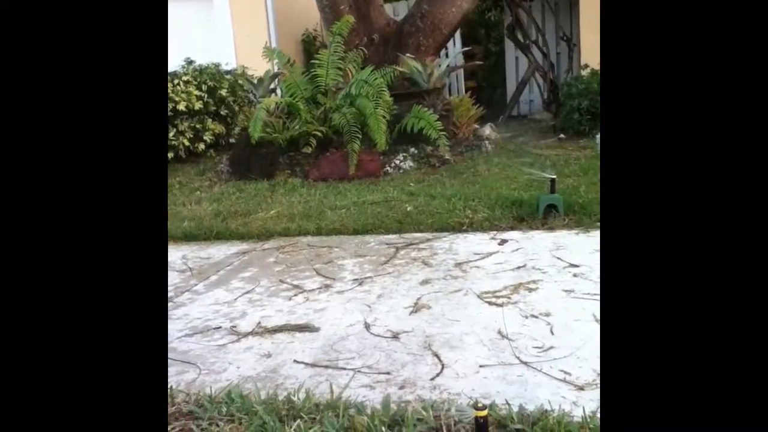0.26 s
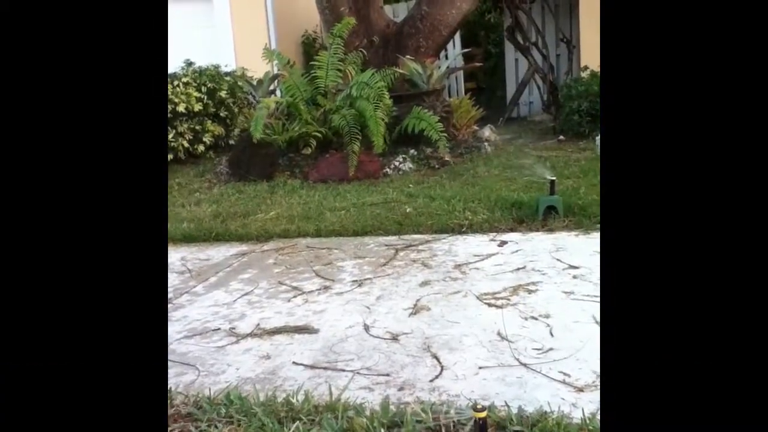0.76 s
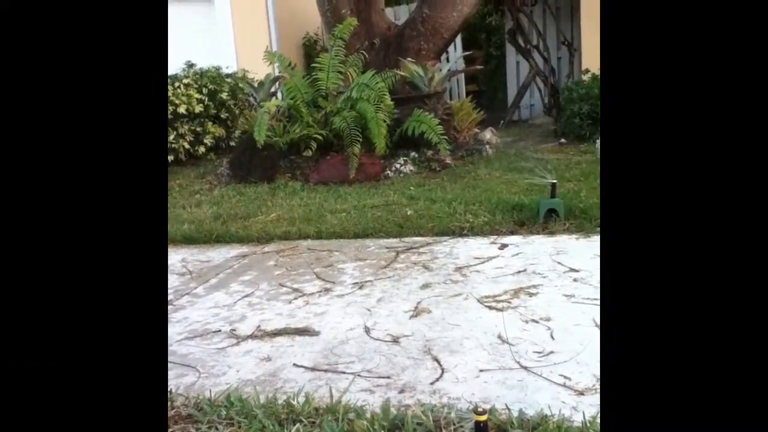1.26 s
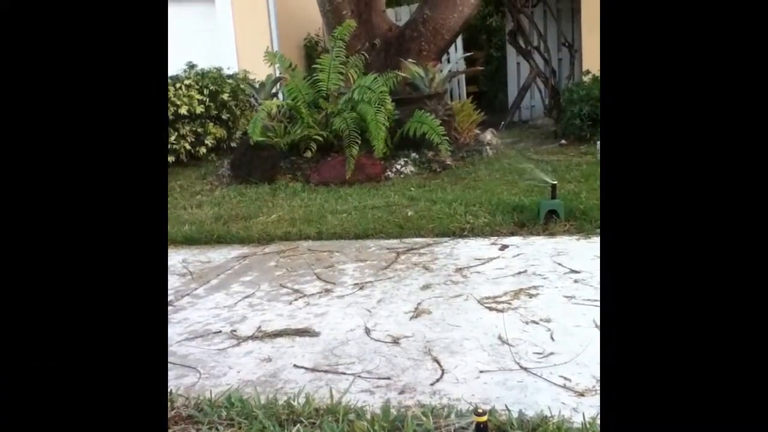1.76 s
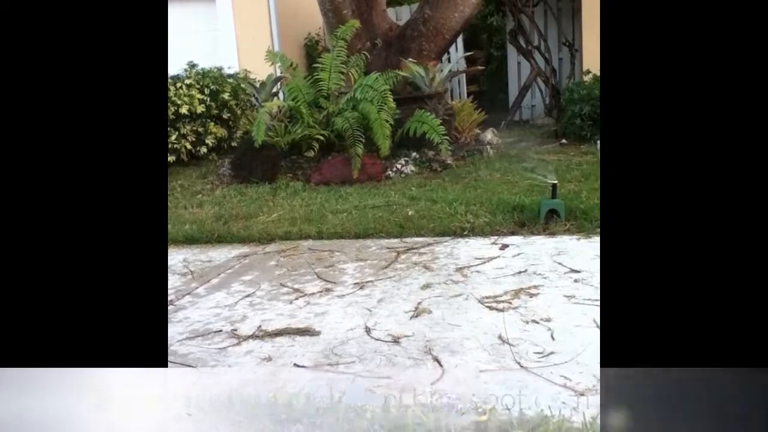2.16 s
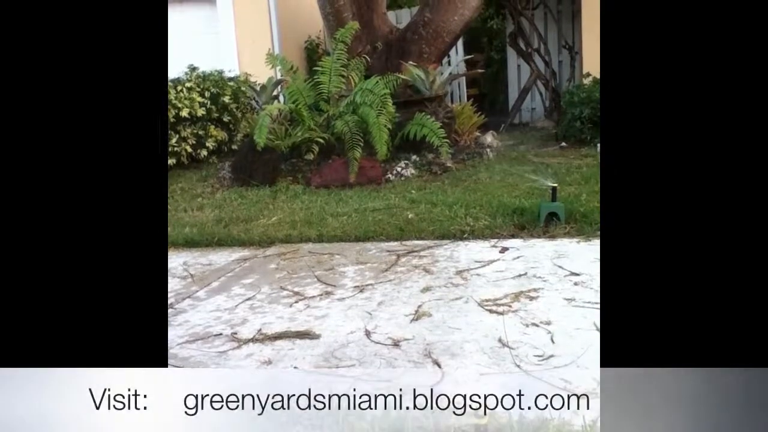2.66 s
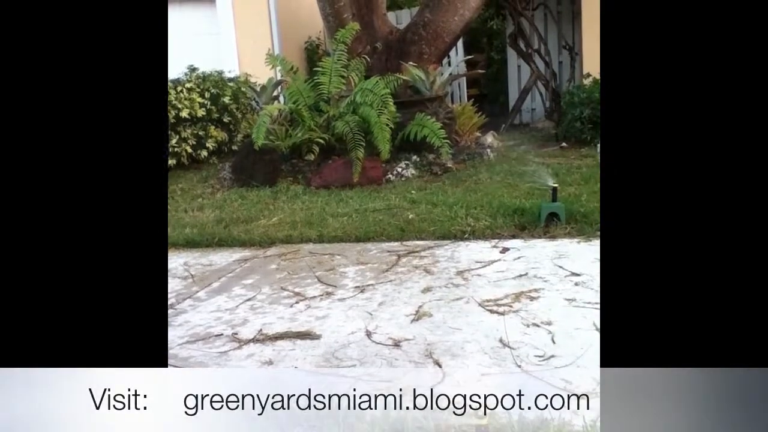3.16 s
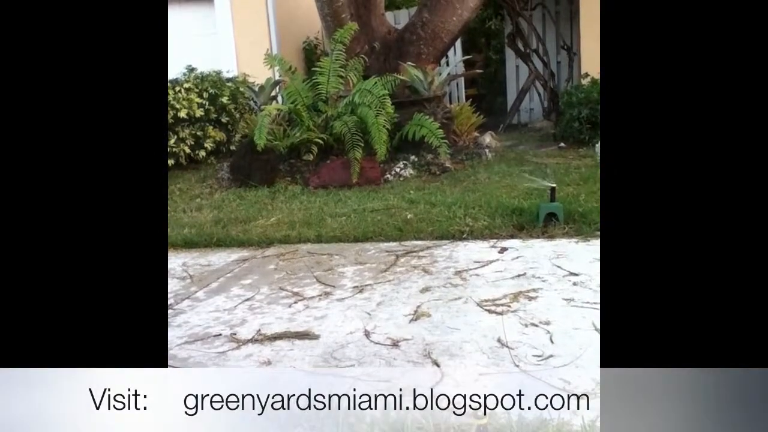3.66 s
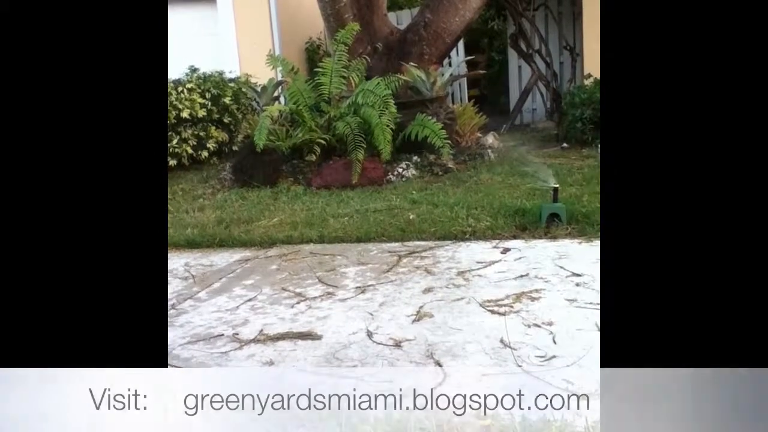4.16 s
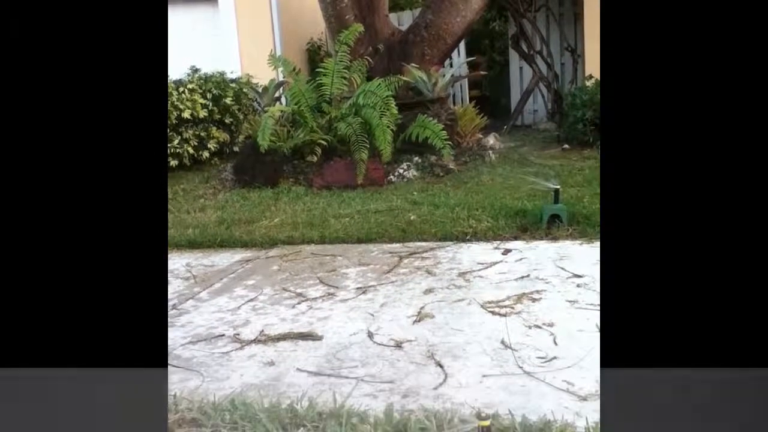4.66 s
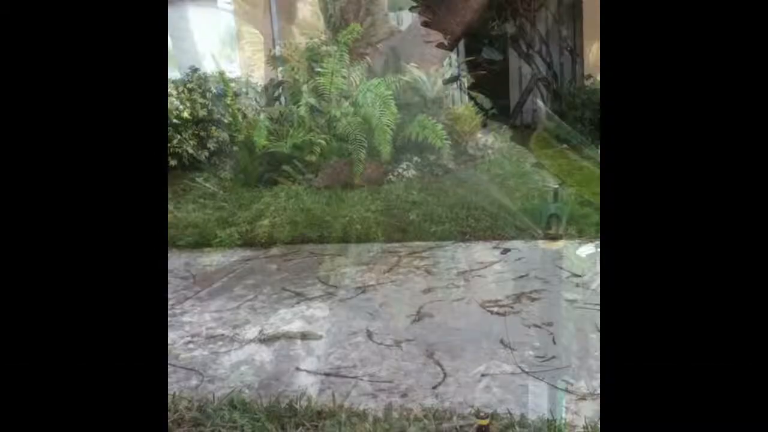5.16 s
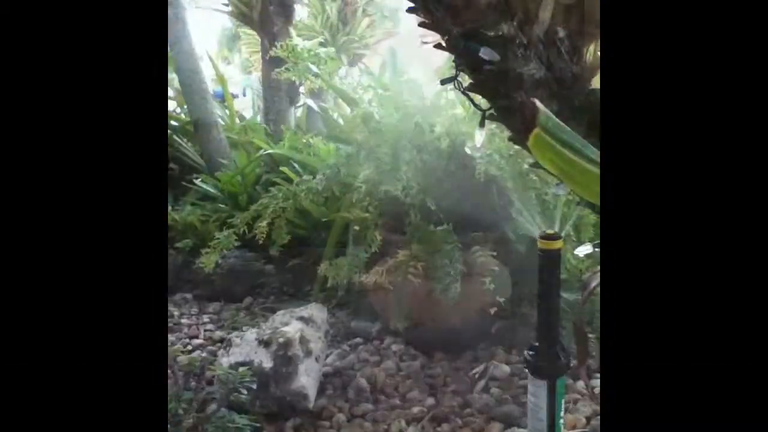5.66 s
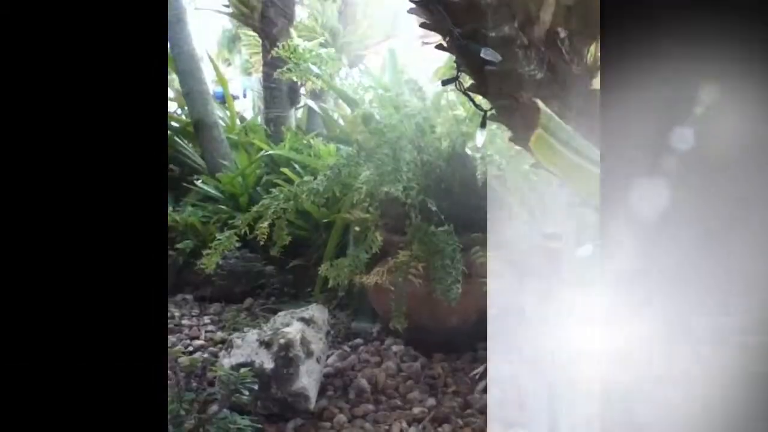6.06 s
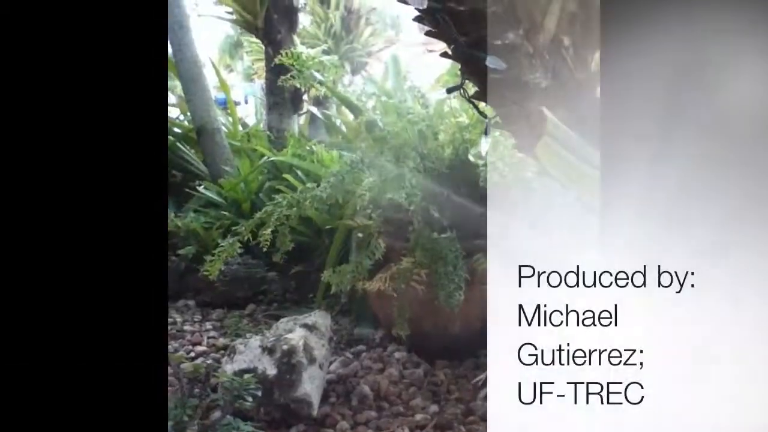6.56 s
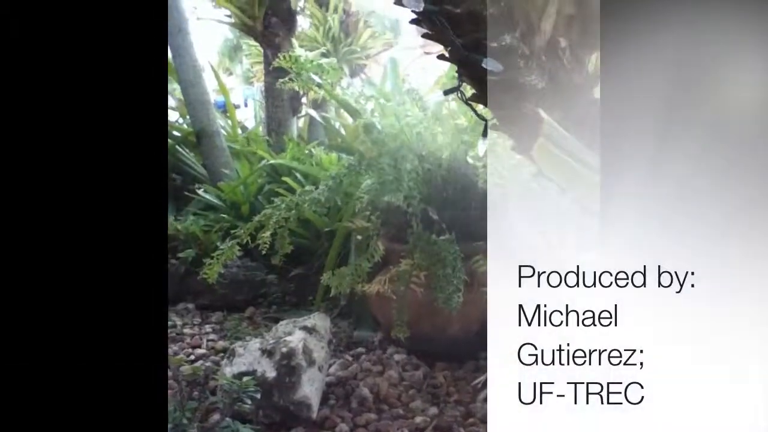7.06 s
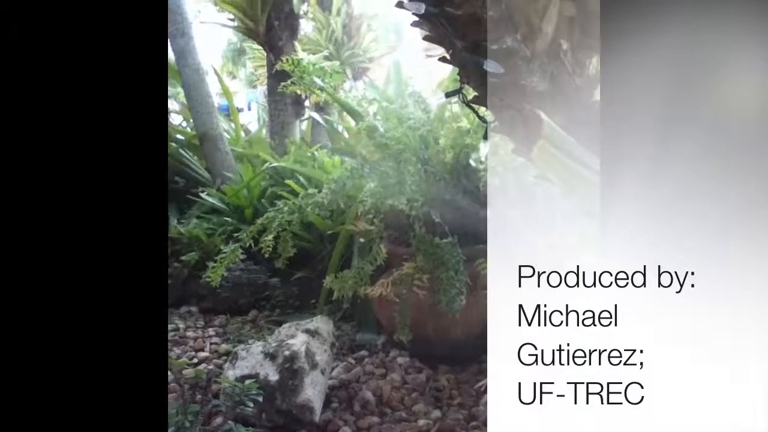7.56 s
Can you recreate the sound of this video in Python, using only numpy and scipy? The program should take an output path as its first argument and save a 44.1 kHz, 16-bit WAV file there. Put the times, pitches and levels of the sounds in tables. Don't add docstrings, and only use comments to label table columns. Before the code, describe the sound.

A lawn sprinkler hisses steadily under thumping wind and low machine hum, then close water streams drum on broad leaves with sharp splatting drops.

```python
import sys
import numpy as np
from scipy import signal
from scipy.fft import rfft, irfft, next_fast_len
from scipy.io import wavfile
from scipy.ndimage import uniform_filter1d, map_coordinates

SR = 44100
rng = np.random.default_rng(int(sys.argv[2]) if len(sys.argv) > 2 else 0)


def attenuation_scalar(level_db):
    decades = np.asarray(level_db, float) / 20
    return 10 ** decades


def output_pcm(signal):
    pcm = np.clip(np.atleast_2d(signal).T, -1, 1) * 32767
    wavfile.write(sys.argv[1], SR, np.round(pcm).astype(np.int16))


N = 343980


def unit(x):
    return x / np.sqrt(np.mean(x ** 2) + 1e-20)


def power_db(*levels_db):
    return 10 * np.log10(sum(attenuation_scalar(db) ** 2 for db in levels_db) + 1e-20)


def curves(rows):
    s, *cols = np.transpose(rows)
    return [np.interp(np.arange(N) / SR, s, c) for c in cols]


def wobble(rate_hz):
    coarse = np.arange(0, N + 32, 32)
    knots = rng.standard_normal(int(N * rate_hz / SR) + 4)
    return np.interp(np.arange(N), coarse, map_coordinates(knots, [coarse * rate_hz / SR]))


def crossing(middle_s, length_s, level_db):
    t = np.arange(0, N / SR, .001)[:, None]
    steepness = np.where(t < middle_s, 3.3, 1.2)
    away = np.abs(2 * (t - middle_s) / length_s) ** steepness
    level = power_db(*(level_db - 6 * np.minimum(away, 20)).T)
    return np.interp(np.arange(N) / SR, t[:, 0], level)


def coloured(x, spectrum):
    m = next_fast_len(N + 8192)
    hz, db = np.transpose(spectrum)
    log_hz = np.log(np.fft.rfftfreq(m, 1 / SR) + 1)
    gain = attenuation_scalar(np.interp(log_hz, np.log(hz), db, left=-120, right=-120))
    return unit(irfft(rfft(x, m) * gain, m)[:N])


def rush(spectrum, patchy_db):
    z = signal.stft(rng.standard_normal(N + 512), nperseg=512)[2]
    field = uniform_filter1d(uniform_filter1d(rng.standard_normal(z.shape), 8, axis=0), 8, axis=1)
    patchy = signal.istft(z * attenuation_scalar(patchy_db * unit(field)), nperseg=512)[1]
    return coloured(patchy[:N], spectrum)


def pings(start_s, hz, cycles, size):
    k = np.arange(192)
    turn = np.outer(hz / SR, k).astype(np.float32)
    swell = 1 - np.exp(-.8 * turn)
    decay = np.exp(-turn * np.float32(np.log(1000) / cycles))
    wave = size[:, None] * np.sin(2 * np.pi * turn) * swell * decay
    at = np.clip((start_s * SR).astype(int), 0, N)[:, None] + k
    return np.bincount(at.ravel(), wave.ravel(), N + 256)[:N]


def drops(count, hz, spread, cycles, scatter_db):
    count = count // 2
    bigness = np.minimum(rng.exponential(size=count), 3)
    size = attenuation_scalar(scatter_db * bigness) * rng.choice([-1, 1], size=count)
    pitch = np.clip(hz * np.exp(spread * rng.standard_normal(count)), 500, 15000)
    half = pings(rng.uniform(0, N / SR / 2, size=count), pitch, cycles, size)
    return unit(half + np.roll(half, N // 2))


def blend(noise, grains, share):
    share = np.clip(share, 0, 1)
    return np.sqrt(1 - share) * noise + np.sqrt(share) * grains


# start_s [s], level_db [dB]
WIND = [
    (0.0, -48),
    (0.19, -41),
    (0.95, -35.5),
    (1.13, -43.5),
    (2.08, -51),
    (2.11, -39.5),
    (2.5, -54.5),
    (3.43, -47),
    (5.37, -58),
    (7.8, -51),
]
# start_s [s], peak_db [dB], pitch_hz [Hz]
WIND_THUMPS = [(0.138, -29, 38.2), (0.224, -24, 53.7), (0.328, -27, 45), (0.627, -39, 37.97),
               (0.67, -19, 81), (0.742, -27, 37.57), (0.808, -20.5, 130), (0.829, -38, 38),
               (0.847, -21, 104), (0.873, -21.5, 127), (0.893, -27, 51.1), (0.936, -20, 110),
               (1.469, -30, 37.4), (1.712, -25.5, 40), (1.787, -39, 91.2), (1.989, -31, 77.9),
               (2.096, -26, 59), (2.164, -40, 37.7), (3.449, -35, 37.7)]
# pitch_hz [Hz], level_db [dB per Hz]
BUFFET = [(10, -23), (25, 2.5), (55, 3), (85, -1.5), (130, -39), (300, -52)]
# pitch_hz [Hz], level_db [dB per Hz]
RUMBLE = [(60, -33), (110, 1), (160, -7), (260, -12.5), (500, -26)]
# pitch_hz [Hz], level_db [dB per Hz]
STREET = [(150, 1), (280, -2), (450, -6.5), (700, -6.5), (1100, -12.5), (2000, -14)]
# pitch_hz [Hz], level_db [dB per Hz]
YARD = [(200, -8), (350, -2.5), (600, 0.5), (1000, 4.5), (1800, -13), (3000, -29)]


def wind_thumps():
    t = np.arange(N) / SR
    thumps = np.zeros(N)
    for s, db, hz in WIND_THUMPS:
        near = slice(max(int((s - .05) * SR), 0), int((s + .1) * SR))
        turn = (t[near] - s) * hz - .6
        thumps[near] -= attenuation_scalar(db - 2.5) * np.cos(2 * np.pi * turn) * np.exp(-(turn / 0.53) ** 2)
    return thumps


def air(fade):
    buffet_db, = curves(WIND)
    t = np.arange(N) / SR
    dip_db = -2.5 * 4 * fade * (1 - fade)
    swell_db = 1 * np.cos(2 * np.pi * (t - 2.03) / 2.6)
    rumble_db = -50 + 1 * wobble(2.51) + swell_db + dip_db - 2 * fade
    drumming_db = crossing(*np.transpose(SWEEPS)[:3]) - 27
    murmur_db = power_db(-56.5 + swell_db + dip_db - 1.5 * fade, drumming_db)
    gusts = unit(attenuation_scalar(2.6 * wobble(7.6)) * rush(BUFFET, patchy_db=-3.0))
    wind = attenuation_scalar(buffet_db + 0.8) * gusts
    rumble = attenuation_scalar(rumble_db - 1.0) * rush(RUMBLE, patchy_db=-2.5)
    murmur = blend(rush(STREET, patchy_db=-1.0), rush(YARD, patchy_db=0.7), fade)
    return wind + wind_thumps() + rumble + attenuation_scalar(murmur_db + 3.5) * murmur


# middle_s [s], length_s [s], level_db [dB]
HUM = [(0.09, 0.2, -42.5), (.55, 0.68, -38.5), (1.19, 0.36, -39), (1.718, 0.55, -40), (2.3, 0.3, -47),
       (2.87, 0.37, -50.5), (3.45, 0.29, -49.5), (3.86, 0.32, -46), (4.24, 0.25, -43.5), (4.577, 0.38, -42),
       (5.005, 0.52, -44.5), (5.444, 0.53, -52.5)]
# multiple [of the hum pitch], level_db [dB]
OVERTONES = [(2, -16), (3, -24.5)]
# pitch_hz [Hz], level_db [dB]
WHINE = [(1040, -66)]
# pitch_hz [Hz], level_db [dB]
DRONE = [(70.0, -58.5), (118.4, -53), (140.0, -57.5), (209.9, -67)]


def machines(fade):
    t = np.arange(N) / SR
    hum_hz = 90.45 + 0.31 * wobble(2.97)
    phase = 2 * np.pi * np.cumsum(hum_hz) / SR
    hum = attenuation_scalar(crossing(*np.transpose(HUM))) * np.sin(phase)
    upper, drone = np.zeros(N), np.zeros(N)
    for multiple, db in OVERTONES:
        upper += attenuation_scalar(-46.0 + db + 1.8 * wobble(4.5)) * np.sin(multiple * phase)
    for hz, db in WHINE:
        upper += attenuation_scalar(db - 4 + 3.3 * wobble(2.93)) * np.sin(2 * np.pi * hz * t + 0.75 * wobble(6))
    for hz, db in DRONE:
        drone += attenuation_scalar(db + 0.1 + 1.4 * wobble(4)) * np.sin(2 * np.pi * hz * t + 0.55 * wobble(3.9))
    return np.sqrt(2) * (hum + (1 - fade) * upper + fade * drone)


# middle_s [s], length_s [s], level_db [dB], pitch_hz [Hz]
PASSING = [
    (3.58, 0.72, -53, 125),
    (4.75, .8, -59.5, 235),
    (4.9, 0.58, -60.5, 220),
    (4.45, 0.38, -55, 140),
]


def engines():
    t = np.arange(N) / SR
    notes = np.zeros(N)
    for s, length, db, hz in PASSING:
        level_db = crossing(*np.transpose([(s, length, db)])) + 2.4 * wobble(7)
        notes += np.sqrt(2) * attenuation_scalar(level_db) * np.sin(2 * np.pi * hz * t + 0.63 * wobble(6))
    return notes


def splats(table, count, low_hz, low_cycles, gain_db, scatter_db, fading_db):
    s, db, low_db, length = np.transpose(table)[:, :, None]
    u, z = rng.uniform(size=(len(s), count)), rng.standard_normal((len(s), count))
    z = np.clip(z, -1, 1)
    order = np.arange(count)
    late = (order + .9 * u * (order > 0)) / count
    at = (s + .0012 + late * length).ravel()
    tick_db = db + gain_db - fading_db * late + scatter_db * (u[:, ::-1] - .5)
    tap_db = db + gain_db + low_db + 6.0 - 11.0 * late
    ticks = pings(at, 8800 * np.exp(0.094 * z).ravel(), 8.2, attenuation_scalar(tick_db).ravel())
    taps = pings(at, low_hz * np.exp(0.12 * z[:, ::-1]).ravel(), low_cycles, attenuation_scalar(tap_db).ravel())
    return ticks + taps


# start_s [s], peak_db [dB], low_part_db [dB], length_s [s]
TICKS = [(0.9553, -19, -10, .0007), (1.0228, -31, -20, .0007), (1.4663, -17.5, -19, 0.001),
         (2.2248, -24, -20, .0007), (3.291, -27, -18, .002), (3.4994, -26, -18, 0.002),
         (3.744, -29, -22, 0.002), (3.8144, -22, -26, .0008), (3.8506, -23, -16, .0008),
         (3.897, -33, -20, 0.0014), (4.9348, -18, -21, 0.0011), (5.2425, -33, -22, .001),
         (5.2508, -27, -22, .001), (5.3592, -13, -30, 0.0013), (5.3615, -25, -18, .001),
         (5.3632, -15, -21, .0007), (5.3652, -24, -12, .001), (5.4766, -20, -24, .002),
         (5.489, -24, -24, .0025), (5.5837, -34, -24, .001), (6.03, -20, -16, .001),
         (6.072, -16.5, -16, 0.003), (6.218, -22, -12, .001), (6.2692, -14, -24, .0014),
         (6.35, -21, -10, .001), (6.4352, -14, -26, 0.0022), (6.4432, -23, -20, .001),
         (6.6308, -20, -24, .0024), (6.635, -17, -24, .002), (6.6412, -13, -30, .0024),
         (6.6947, -19, -24, .0005), (6.7271, -18, -24, .0024), (6.794, -17, -18, .001),
         (7.0955, -24, -22, .001), (7.148, -26, -15, 0.001), (7.1895, -27, -9, .001),
         (7.2167, -14, -30, .001), (7.3452, -22, -24, .002), (7.6284, -24, -10, .001)]
# start_s [s], peak_db [dB], low_part_db [dB], length_s [s]
SPLATS = [(5.2894, -36, -10, 0.01), (5.3596, -25, -21, 0.009), (5.472, -17, -28, 0.015),
          (5.488, -22, -28, 0.013), (5.785, -22, -19, 0.0076), (6.267, -13.5, -30, 0.01),
          (6.436, -14, -16.5, 0.012), (6.627, -17, -33, 0.018), (6.68, -18, -32, 0.01),
          (6.724, -15, -33, 0.013), (7.188, -26, -11, 0.015), (7.3421, -10.5, -27, 0.016)]


def stray_drops():
    small = splats(TICKS, count=2, low_hz=6200, low_cycles=11.0, gain_db=17.0, scatter_db=-1.0, fading_db=7.0)
    big = splats(SPLATS, count=15, low_hz=2830, low_cycles=11.6, gain_db=11.0, scatter_db=6, fading_db=5.5)
    return small + big


# start_s [s], level_db [dB], pitch_hz [Hz]
TAPS = [(0.957, -15, 9500), (0.9573, -22, 3500), (1.1308, -14, 6400), (1.1312, -15, 9500),
        (1.4598, -16, 12000), (2.4463, -15, 5800), (4.0698, -22, 4200), (4.936, -11, 5700),
        (4.937, -15, 4370), (5.3612, -10, 6200), (5.365, -13, 5800), (5.786, -14, 5500), (5.5849, -9, 9000),
        (6.1252, -11, 3000), (6.5767, -8, 9000), (6.6186, -8, 4500), (6.7153, -15, 3000),
        (6.8989, -16, 2600), (7.3948, -12, 4500), (7.5025, -3, 4270), (6.4372, -3.5, 9000),
        (6.4388, -6, 8500), (7.6797, -5, 4000), (6.2195, -6, 4000)]


def lone_drops():
    s, db, hz = np.transpose(TAPS)
    return pings(s, hz, 7.8, attenuation_scalar(db))


# middle_s [s], peak_db [dB], pitch_hz [Hz]
POPS = [
    (7.436, -20.5, 1805),
    (7.435, -30, 2170),
]


def pops():
    t = np.arange(N) / SR
    return sum(attenuation_scalar(db) * np.sin(2 * np.pi * hz * t) * np.exp(-((t - s) / 0.0051) ** 2) for s, db, hz in POPS)


# middle_s [s], length_s [s], drop_db [dB], leaf_hz [Hz]
LEAVES = [(3.518, 0.047, -39, 2750), (3.56, .05, -41, 4300), (3.71, 0.047, -36, 2780),
          (3.74, 0.043, -42, 2050), (3.801, 0.082, -44, 2300), (6.036, 0.029, -37, 1310),
          (6.232, .08, -28, 4500), (7.67, .08, -25.5, 1550), (7.632, .05, -26, 4300),
          (7.74, 0.055, -28, 4400), (6.13, .1, -30.5, 1500), (6.169, .1, -30, 3100),
          (7.689, 0.11, -26, 4200), (7.4, .04, -33, 4500), (5.291, .015, -36, 1400),
          (5.33, 0.037, -33, 3300), (5.68, 0.073, -36, 2980), (5.789, 0.0099, -28, 3220),
          (6.042, 0.028, -30.5, 1930), (6.202, 0.056, -29, 1890), (6.371, 0.08, -19.5, 4200),
          (6.365, 0.025, -16.5, 1800), (6.392, 0.032, -22.5, 1660), (6.487, 0.022, -24.5, 1710),
          (6.5, 0.061, -18, 4180), (6.515, .04, -19, 3000), (6.563, 0.031, -23, 1930),
          (6.612, .02, -23, 4600), (6.722, .012, -27.5, 3070), (6.904, 0.018, -32, 2600),
          (7.508, 0.056, -18, 4350), (7.555, 0.046, -31, 1480), (7.569, 0.048, -22.5, 4300),
          (7.679, 0.05, -23, 3300), (7.7, 0.076, -28, 4950), (7.79, 0.019, -26, 1900)]


def struck_leaves(count):
    s, length, db, hz = np.transpose(LEAVES)[:, :, None]
    shape = (len(s), count)
    when, detune, strength = rng.uniform(-.5, .5, shape), rng.standard_normal(shape), rng.standard_normal(shape)
    crowd_db = 10 * np.log10(length / .05)
    size = attenuation_scalar(db + 1.0 + crowd_db + 3.7 * strength)
    return pings((s + when * length).ravel(), (hz * np.exp(0.09 * detune)).ravel(), 13.2, size.ravel())


# pitch_hz [Hz], level_db [dB per Hz]
FIZZ = [(9500, -37), (10800, 4), (12000, 4), (13200, -2.5), (14300, -1), (15300, -3.5), (16000, -6)]
# start_s [s], level_db [dB], landing_distance_m [m]
FAR = [(0, -35.5, 3.7), (.6, -35.5, 5), (1.15, -35.5, 4.3), (1.3, -37.5, 4.1), (1.5, -36, 3.4),
       (2.0, -39, 4.55), (2.5, -36.5, 6.6), (2.85, -36.5, 5.6), (3.5, -38.5, 5.3), (3.8, -36, 4.7),
       (3.95, -38, 4.9), (4.4, -37.5, 5.8), (4.6, -38.5, 4.6), (4.68, -36, 5.3), (4.9, -39, 4.4)]
# middle_s [s], length_s [s], level_db [dB]
PASSES = [(.2, 0.076, -44.5), (0.372, 0.1, -48.5), (.96, 0.038, -48.5), (1.523, 0.033, -46.5),
          (1.832, 0.043, -48.5), (2.23, 0.19, -50.5), (3.335, 0.17, -51), (3.494, .07, -49.5),
          (3.553, 0.073, -44), (3.714, 0.12, -48.5), (3.84, 0.055, -52), (4.175, 0.066, -52.5),
          (4.49, .05, -53), (4.643, .06, -67)]
# pitch_hz [Hz], level_db [dB per Hz]
HISS_FAR = [(3000, -33), (5000, -12.5), (7200, -14.5), (8400, -5), (9550, 1), (10500, -7), (11500, -11),
            (13000, -26)]
# pitch_hz [Hz], level_db [dB per Hz]
GRASS = [(400, -39), (900, -5.5), (1600, -2.5), (2800, 1), (4500, -1), (6500, -1.5), (10000, -8.5)]
# pitch_hz [Hz], level_db [dB per Hz]
MIST = [(5000, -54), (6800, -1), (8200, 7), (9000, -4), (10000, -12)]
# pitch_hz [Hz], level_db [dB per Hz]
SHRUBS = [(800, -12), (1500, -1.5), (2500, 0), (4000, -2.5), (6500, -3.5), (9000, -14)]


def far_sprinkler():
    t = np.arange(N) / SR
    hiss_db, metres = curves(FAR)
    spreading_db = -20 * np.log10(metres)
    patter_db = -35.5 + spreading_db
    cloud_db = 8 / (1 + (t / 0.99) ** 12)
    mist_db = -30.5 + spreading_db + cloud_db
    fizz_db = -43 + 0.67 * t + .3 * (hiss_db - hiss_db.mean())
    sputter = wobble(14)
    nozzle_drops = drops(count=9000, hz=9270, spread=0.13, cycles=14, scatter_db=2.5)
    hiss = blend(rush(HISS_FAR, patchy_db=1.0), nozzle_drops, share=0.2)
    grass_drops = drops(count=9000, hz=3500, spread=0.49, cycles=3.8, scatter_db=2.5)
    patter = blend(rush(GRASS, patchy_db=1.5), grass_drops, share=0.17)
    mist = attenuation_scalar(mist_db - 5.0) * rush(MIST, patchy_db=2.5)
    fizz = attenuation_scalar(fizz_db - 0.6 + 1.1 * wobble(10) + 0.27 * sputter) * rush(FIZZ, patchy_db=1.5)
    shrubs_db = crossing(*np.transpose(PASSES)) + 3.5 + 0.81 * wobble(29.97)
    shrubs = attenuation_scalar(shrubs_db) * rush(SHRUBS, patchy_db=-0.2)
    jet = attenuation_scalar(hiss_db + 0.25 + 0.5 * sputter) * hiss + attenuation_scalar(patter_db + 3.0 + .5 * sputter) * patter
    return jet + mist + fizz + shrubs


# start_s [s], level_db [dB]
NEAR = [(4.86, -39), (5.2, -37), (5.6, -34.5), (5.78, -29.5), (5.855, -30), (5.875, -35), (6.08, -30.5),
        (6.16, -33), (6.5, -29.5), (6.59, -32.5), (6.66, -30.5), (7.0, -31), (7.35, -28), (7.47, -29),
        (7.56, -27.5), (7.62, -29.5), (7.68, -28.5), (7.8, -30.5)]
# middle_s [s], length_s [s], level_db [dB], heavy_over_fine_db [dB]
SWEEPS = [(4.993, 0.26, -46, 0.5), (5.276, 0.16, -44.5, 2.5), (5.293, 0.02, -42, 0),
          (5.343, 0.075, -42.5, -9), (5.48, 0.024, -45, 3), (5.55, 0.067, -49, 1), (5.683, 0.082, -44.5, 4),
          (5.808, 0.16, -41.5, 2.5), (5.946, 0.14, -43, 0.5), (6.103, 0.16, -32, 0.5),
          (6.217, 0.12, -28, -0.5), (6.329, 0.054, -27.5, 2.5), (6.377, 0.075, -26.5, 3.5),
          (6.487, 0.051, -28, 1), (6.537, 0.088, -28.5, 1.5), (6.631, 0.06, -31.5, 2),
          (6.716, 0.17, -35.5, -2.5), (6.828, 0.092, -36, -2), (6.908, 0.027, -35.5, -5),
          (7.006, 0.18, -42.5, 0), (7.172, 0.048, -41, 6.5), (7.19, 0.011, -29.5, -2.5),
          (7.26, 0.16, -37, -3), (7.356, 0.055, -39, 1), (7.408, 0.054, -30, -4),
          (7.437, 0.036, -35.5, 8.5), (7.543, 0.15, -29, 1), (7.696, 0.11, -27.5, 0.5),
          (7.81, 0.064, -29.5, 0)]
# pitch_hz [Hz], level_db [dB per Hz]
HISS_NEAR = [(3000, -26), (5000, -16.5), (6500, -15.5), (8360, 0.5), (9500, -2), (11000, -8),
             (14500, -10.5), (16000, -18)]
# pitch_hz [Hz], level_db [dB per Hz]
SIZZLE = [(4500, -13), (5500, 1.5), (6800, 3), (8000, -2.5), (9500, -25)]


def near_sprinkler():
    t = np.arange(N) / SR
    middle, length, db, heavy_over_db = np.transpose(SWEEPS)
    stream_db = crossing(middle, length, db)
    hiss_db = power_db(*curves(NEAR), stream_db - 4.5)
    drip_fine_db, drip_heavy_db = -45.5, -47.5
    fine_db = power_db(drip_fine_db, stream_db)
    heavy_db = power_db(drip_heavy_db, crossing(middle, length, db + heavy_over_db))
    sputter = wobble(28)
    nozzle_drops = drops(count=12000, hz=8800, spread=.14, cycles=14, scatter_db=3.5)
    hiss = blend(rush(HISS_NEAR, patchy_db=1.3), nozzle_drops, share=.25)
    fine_spray = rush([(2200, -2.0), (3100, 0.5), (4200, -1.0), (5200, -4.0), (7500, -5.0)], patchy_db=2.5)
    fine_drops = drops(count=12000, hz=4550, spread=0.204, cycles=20, scatter_db=5.0)
    fine = blend(fine_spray, fine_drops, share=0.23)
    heavy_spray = rush([(450, -18.0), (800, -11.5), (1200, -5.5), (1800, -4), (2500, -7.5), (3600, -11)],
                       patchy_db=1.2)
    heavy_drops = drops(count=6000, hz=1917, spread=0.2, cycles=12.6, scatter_db=6.0)
    heavy = blend(heavy_spray, heavy_drops, share=0.29)
    sizzle_db = -52 + 1 * (fine_db - drip_fine_db) + 0.5 * sputter
    sizzle = attenuation_scalar(sizzle_db) * rush(SIZZLE, patchy_db=2.2)
    linger_db = -44 - 4 * np.maximum(t - NEAR[0][0], 0)
    burst_db = stream_db - 11
    fizz = attenuation_scalar(power_db(burst_db, linger_db) + 1.9 * wobble(16)) * rush(FIZZ, patchy_db=-0.5)
    patter = attenuation_scalar(fine_db - 2.0 + 1 * sputter) * fine + attenuation_scalar(heavy_db - 5.0 + 1 * sputter) * heavy
    return fizz + sizzle + attenuation_scalar(hiss_db - 0.4 + 0.22 * sputter) * hiss + patter


# start_s [s], end_s [s]
FADE = (5.04, 6.25)


def scene():
    t = np.arange(N) / SR
    fade = np.interp(t, FADE, (0, 1))
    change_s = FAR[-1][0]
    near = np.interp(t, (change_s - .03, change_s + 0.024), (0, 1))
    water = np.sqrt(1 - near) * far_sprinkler() + np.sqrt(near) * near_sprinkler()
    single_drops = stray_drops() + lone_drops() + pops() + struck_leaves(count=36)
    background = air(fade) + machines(fade) + engines()
    left = 2 * (water + single_drops + background)
    return np.array([left, np.zeros(N)])


# pitch_hz [Hz], threshold_db [dB]
AUDIBLE = [(700, -8), (1300, -4.5), (5000, -5), (7000, -9), (12000, -9), (13000, -5), (16000, -4.5)]
# middle_s [s], length_s [s], rise_db [dB], pitch_hz [Hz], width_hz [Hz]
TREBLE_THINNING = [(.4, 1.1, 6, 14200, 200), (2.8, .85, 5.5, 14400, 1200), (2.68, .1, 7, 14500, 550),
                   (2.87, .12, 5, 14200, 350), (3.16, .05, 6, 14600, 400), (6.8, 2.2, 4, 14000, 2300),
                   (6.8, 2.2, 5, 15900, 900), (5.82, .15, 3, 14600, 900), (6.4, .35, 3, 15500, 800),
                   (6.9, .35, 2, 13200, 1000), (7.3, .2, 2, 13300, 1200), (7.45, .3, 3, 15500, 700)]


def silence_faint_patches(sound, top_hz):
    hz, t, z = signal.stft(sound, SR, nperseg=2048)
    power = np.abs(z) ** 2
    local = np.sqrt(np.abs(uniform_filter1d(power, size=5, axis=0)))
    around = np.sqrt(np.abs(uniform_filter1d(power, size=48, axis=0)))
    field = uniform_filter1d(rng.standard_normal(z.shape), size=16, axis=0)
    luck = unit(uniform_filter1d(field, size=2, axis=1))
    rise_db = np.zeros(z.shape)
    for s, length, db, at_hz, wide_hz in TREBLE_THINNING:
        rise_db += db * np.exp(-((hz[:, None] - at_hz) / wide_hz) ** 2 - (2 * (t - s) / length) ** 6)
    threshold_db = np.interp(hz, *np.transpose(AUDIBLE), left=-60)[:, None]
    spared_db = -4 * np.outer(hz < 7000, t > FADE[1])
    threshold = attenuation_scalar(threshold_db + spared_db + rise_db * (1 + .35 * luck))
    kept = np.clip(10 * (local / (around + 1e-12) / threshold - 1), 0, 1) * (hz < top_hz)[:, None]
    return signal.istft(z * kept, SR, nperseg=2048)[1][:N]


def roll_off(x):
    return signal.sosfilt(signal.butter(12, 15765, fs=SR, output="sos"), x)


def record(dry):
    ceiling = .76
    rounded = dry[0] / (1 + np.abs(dry[0] / ceiling) ** 6) ** (1 / 6)
    left = silence_faint_patches(rounded, top_hz=15765)
    return roll_off(np.array([left, dry[1]]))


dry = scene()
out = record(dry)
output_pcm(out)
```